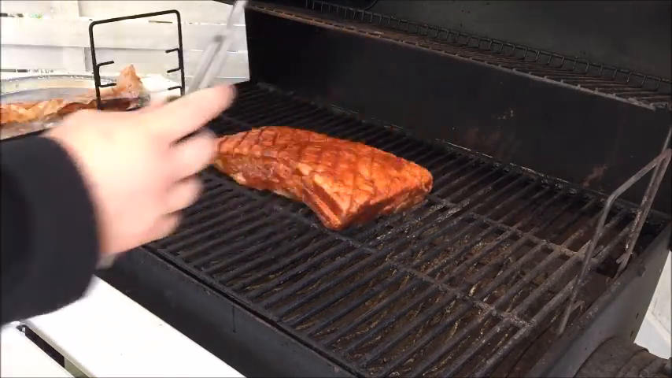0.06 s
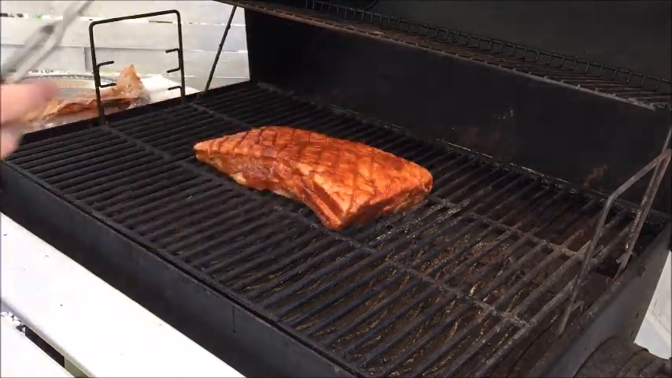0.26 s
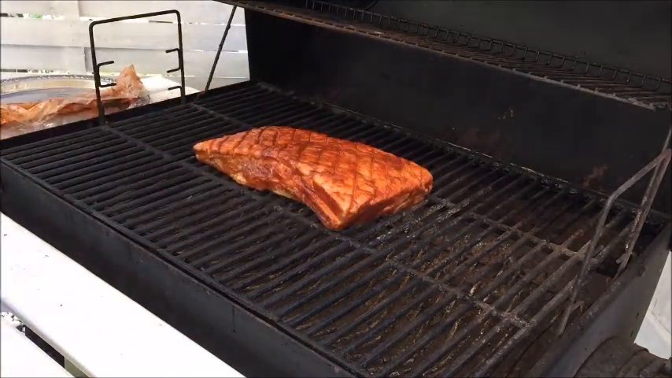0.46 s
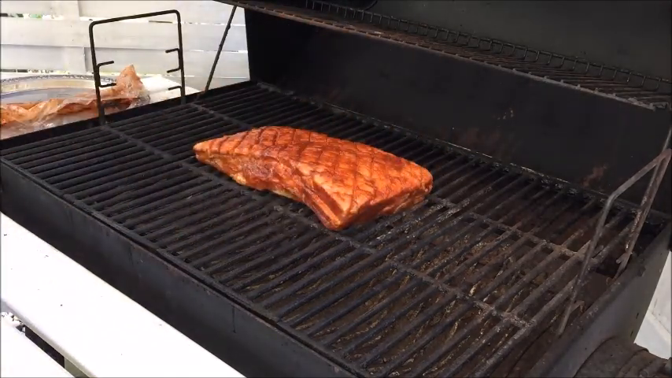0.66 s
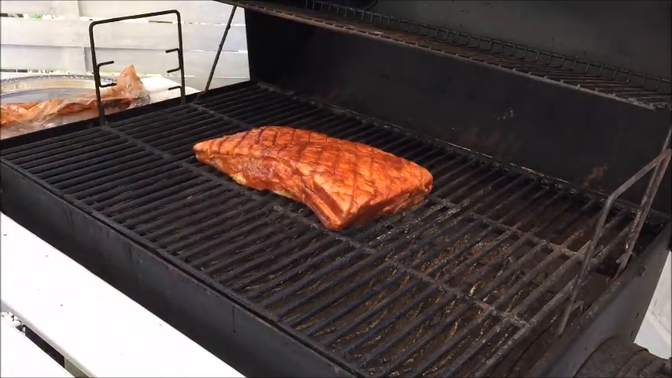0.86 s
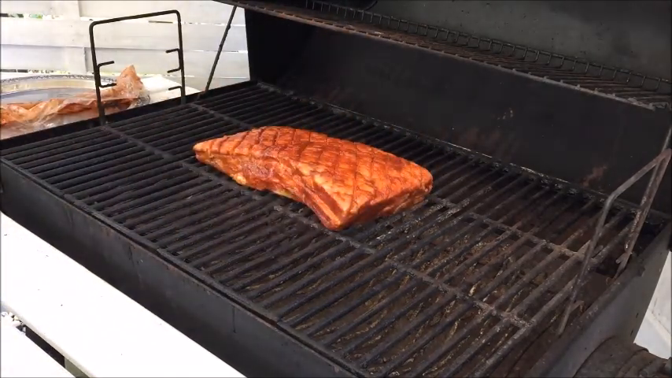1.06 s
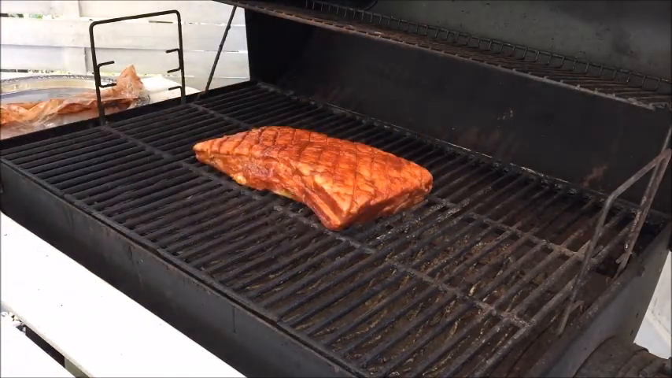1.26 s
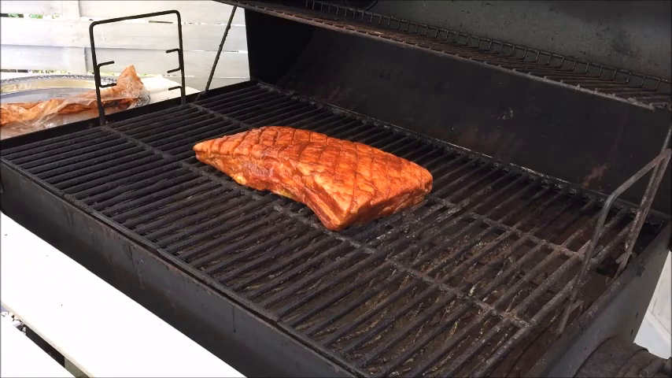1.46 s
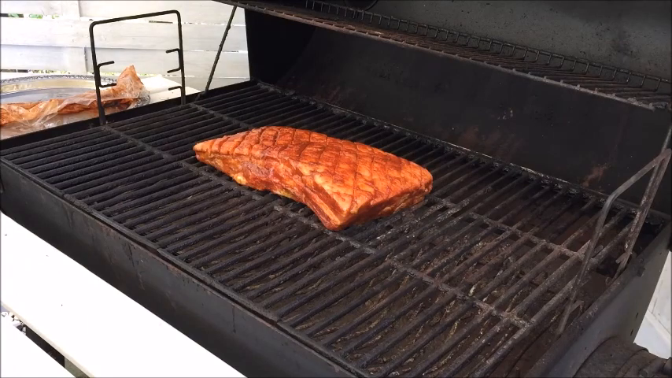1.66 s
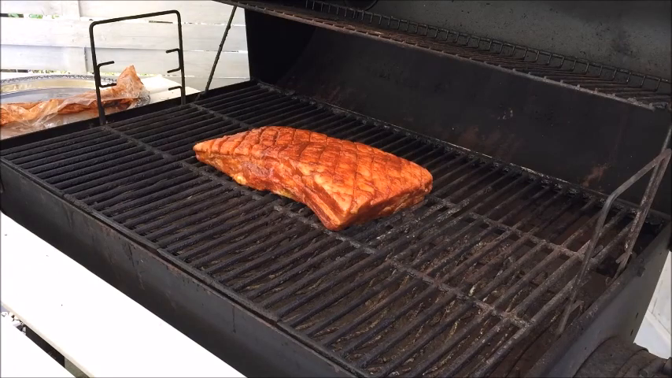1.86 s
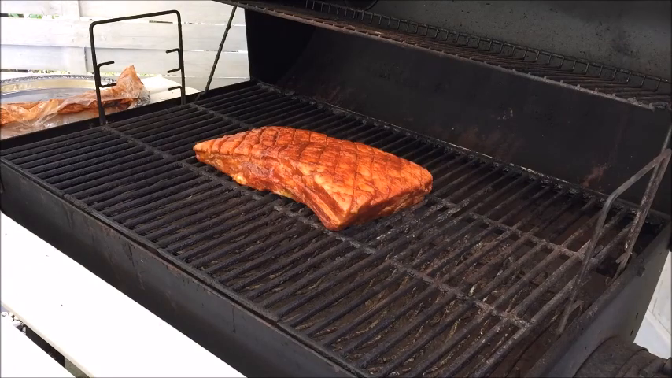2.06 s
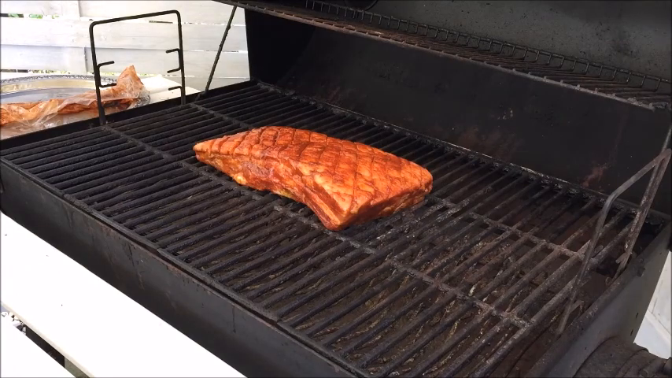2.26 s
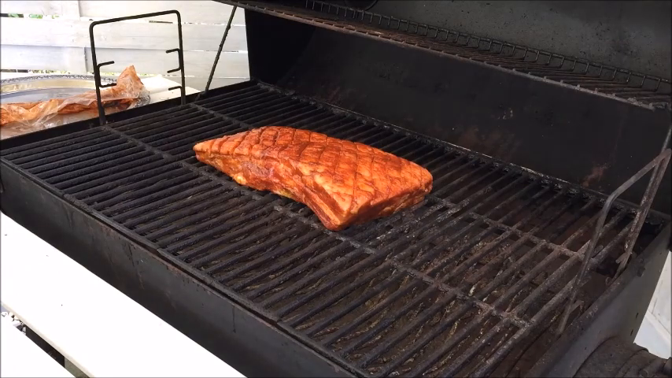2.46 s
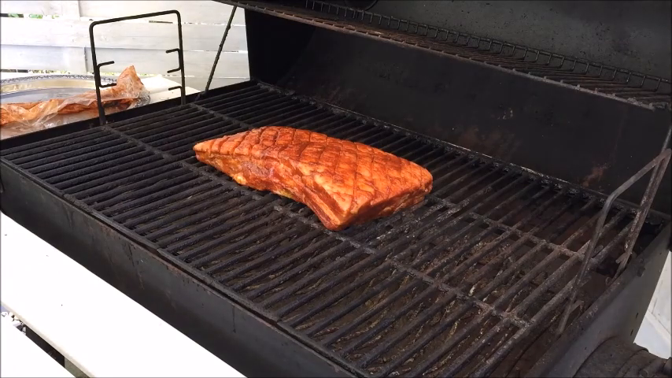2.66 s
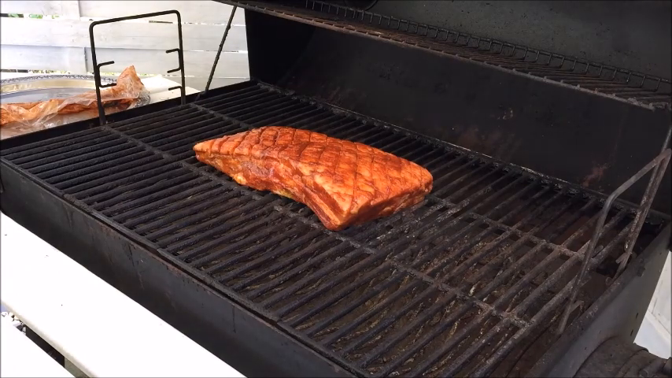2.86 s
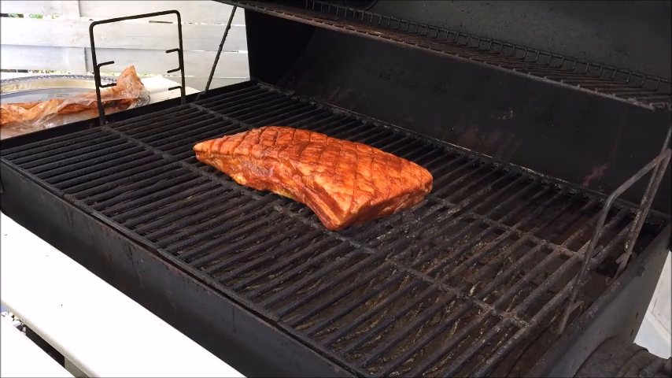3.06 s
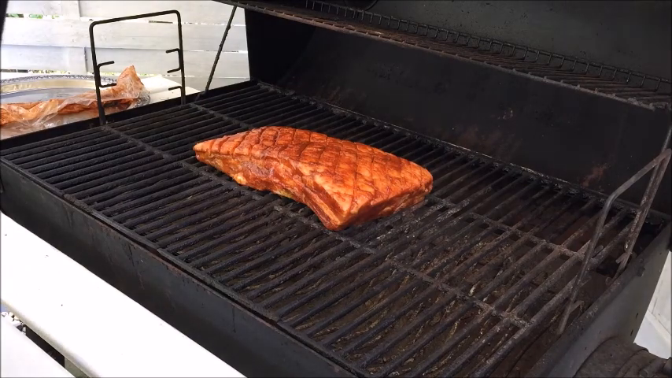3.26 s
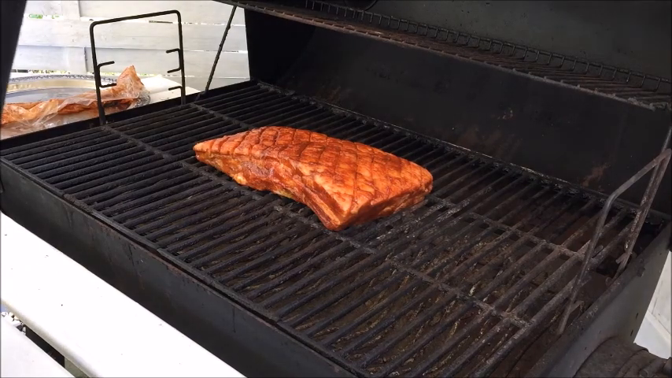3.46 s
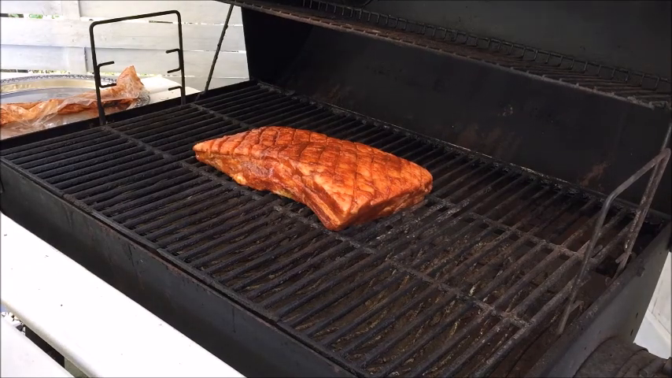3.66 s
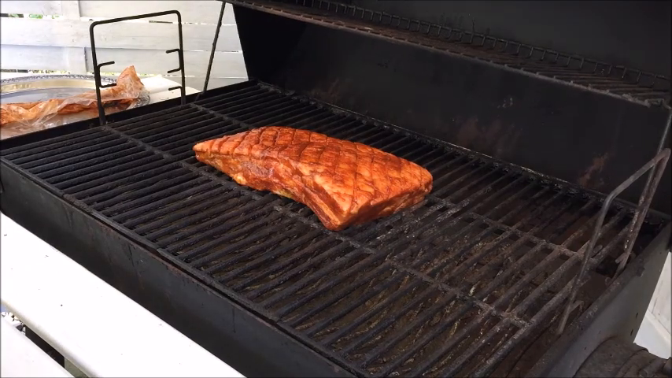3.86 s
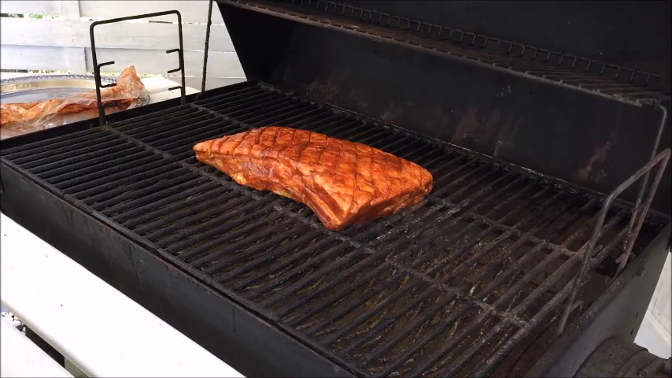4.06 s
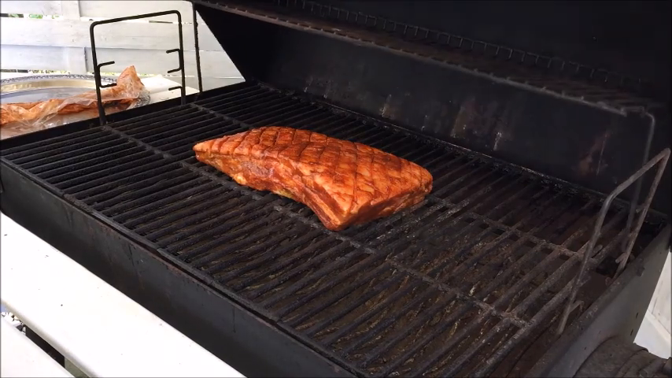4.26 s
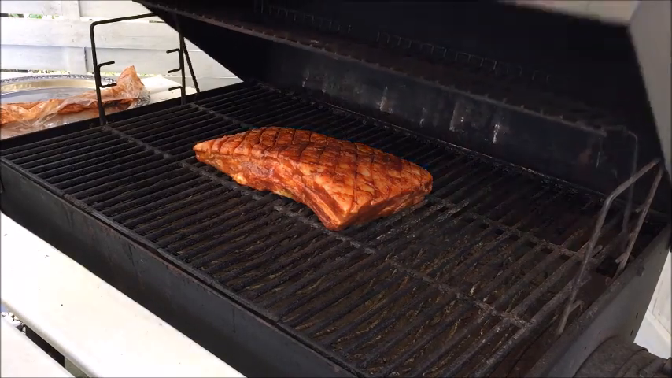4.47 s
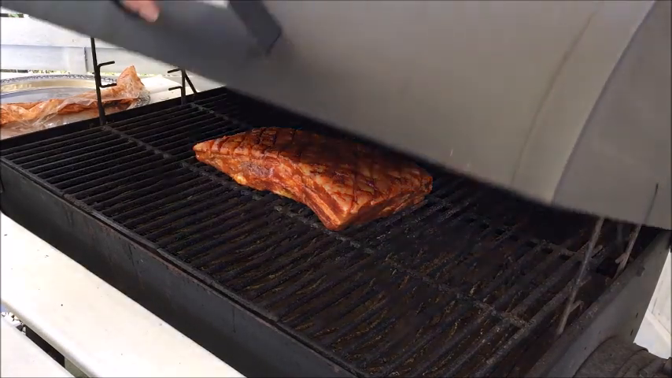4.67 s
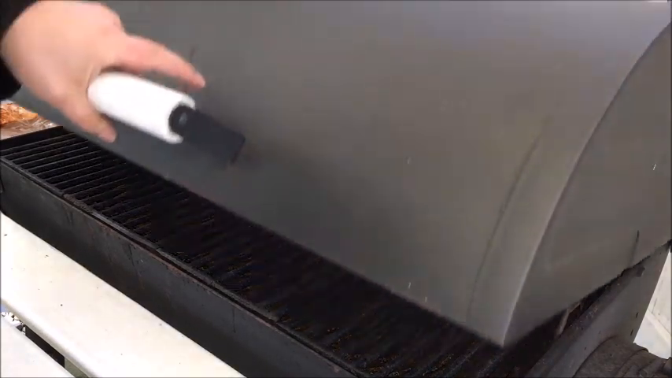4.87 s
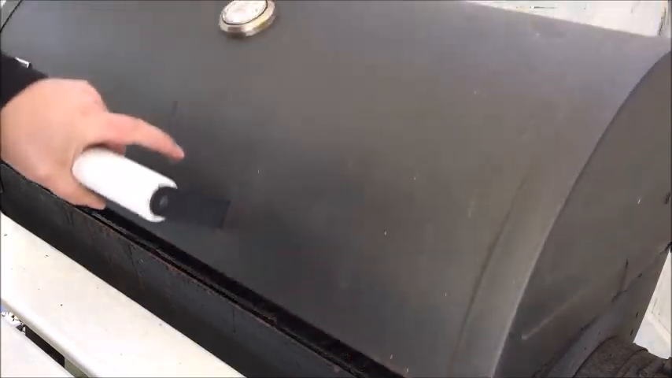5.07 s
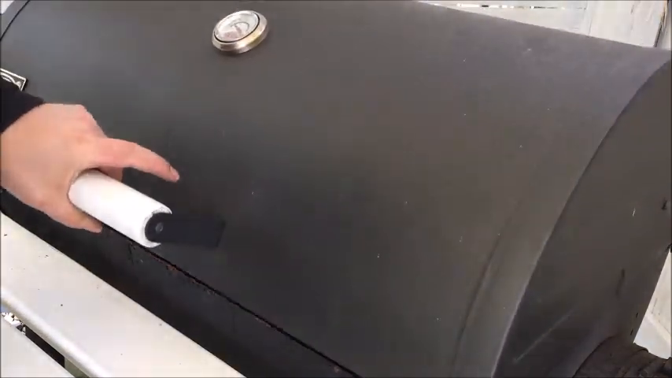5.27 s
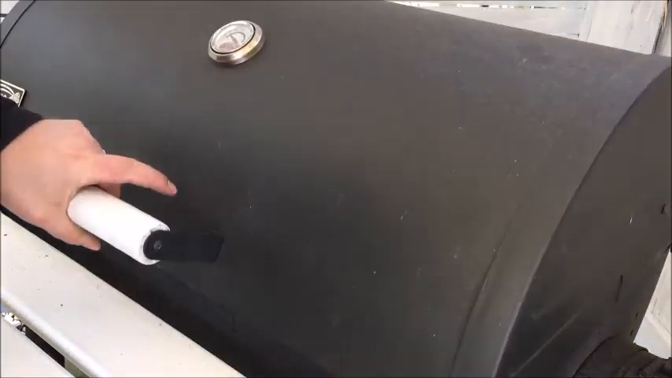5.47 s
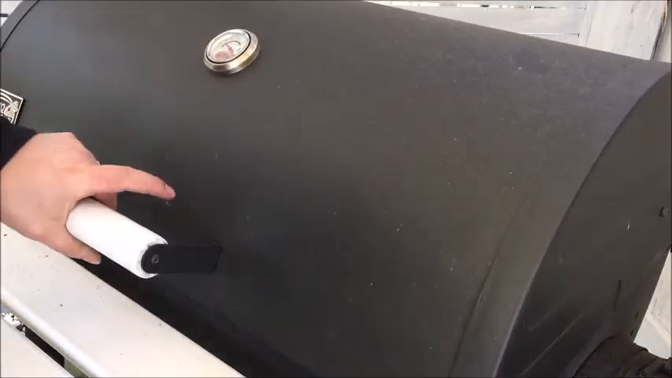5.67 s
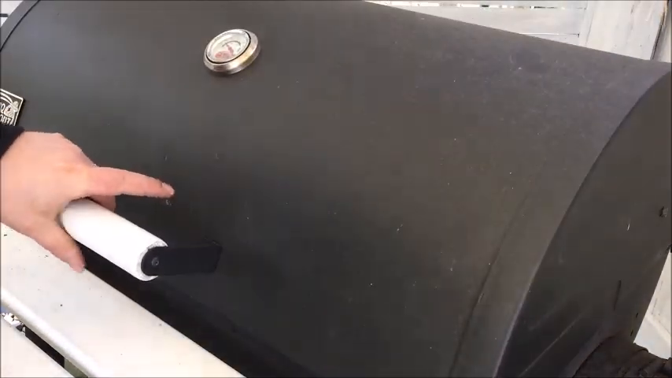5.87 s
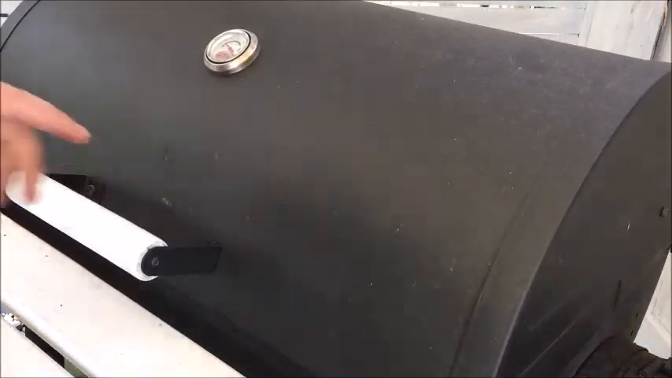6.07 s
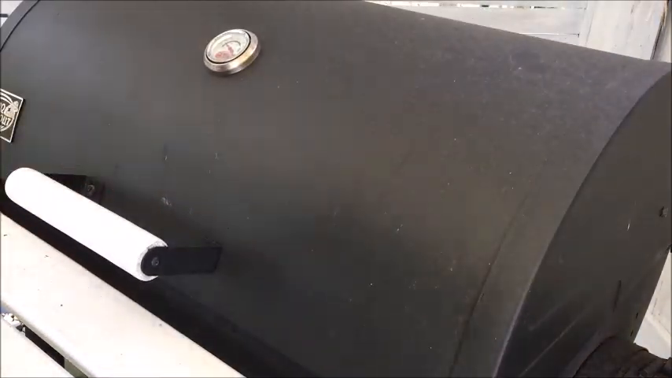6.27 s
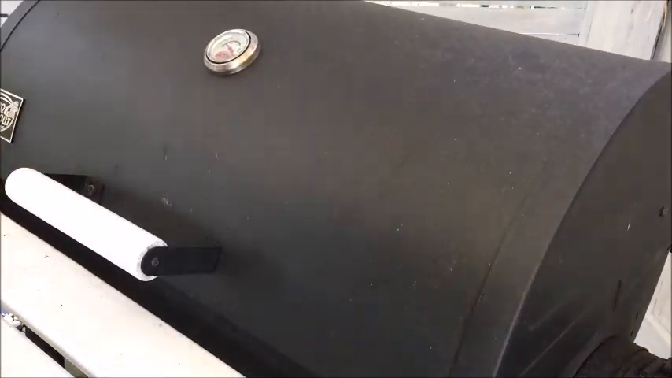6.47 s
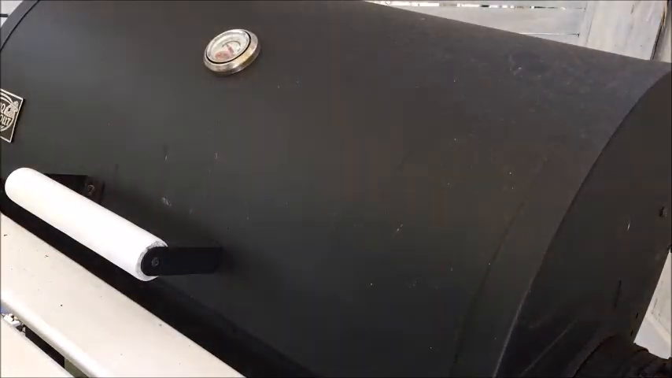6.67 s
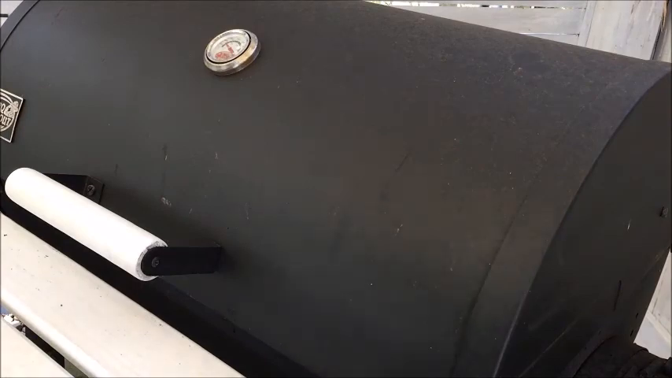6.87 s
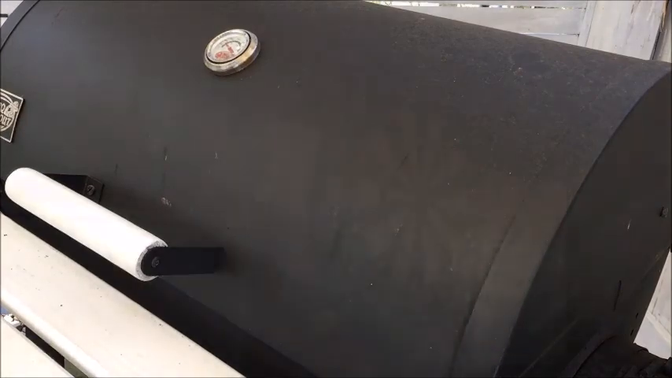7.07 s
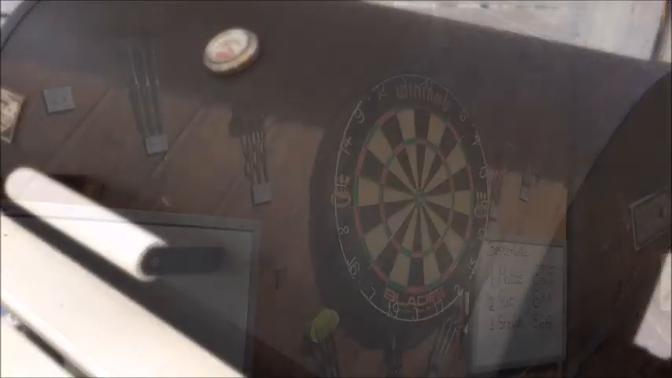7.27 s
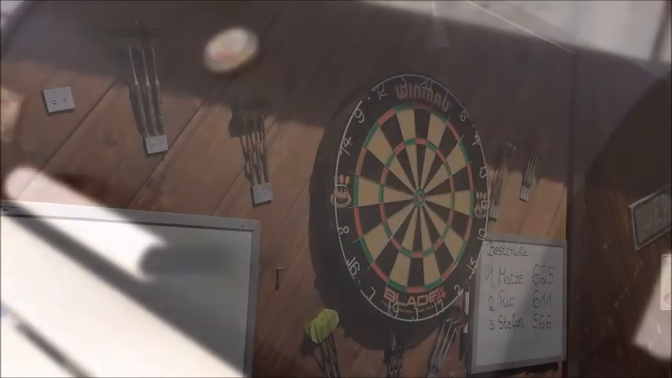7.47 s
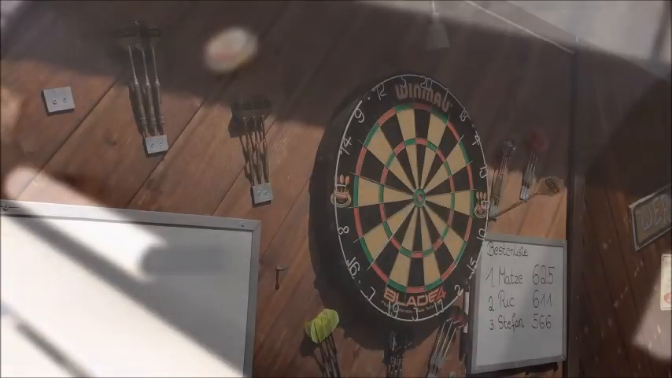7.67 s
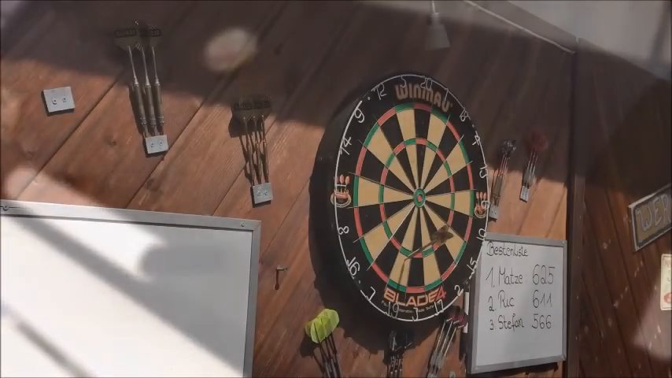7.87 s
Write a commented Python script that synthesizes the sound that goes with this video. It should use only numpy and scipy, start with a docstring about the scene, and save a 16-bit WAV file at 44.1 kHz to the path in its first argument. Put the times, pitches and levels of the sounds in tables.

```python
"""Outdoors, one microphone close to a steel barrel smoker. Traffic rumbles far off and small birds repeat
their songs in the trees throughout. First, tongs click, scrape and snap shut among hollow bumps; at 3.7 s
a steel utensil is set down. From 4.2 s the lid swings down on a dry, grinding, squeaking hinge, and at
5.7 s it slams: the barrel booms, the racks rattle, the lid and grate ring out. At the very end come
faint rustling ticks, some low buffeting and one dull knock."""
import sys
import numpy as np
from scipy import signal
from scipy.fft import rfft, irfft, next_fast_len
from scipy.io import wavfile
from scipy.ndimage import map_coordinates

SR = 44100
rng = np.random.default_rng(int(sys.argv[2]) if len(sys.argv) > 2 else 0)


def file_out(sig):
    """Save sig as 16-bit WAV at sys.argv[1]."""
    # one column per channel
    cols = np.atleast_2d(sig).T
    # limit, then scale
    lim = np.clip(cols, -1, 1)
    pcm = np.round(lim * 32767).astype(np.int16)
    wavfile.write(sys.argv[1], SR, pcm)


N = 349713


def amp(db):
    return 10 ** (np.asarray(db) / 20)


def unit(x):
    """Scales to an rms of one."""
    return x / np.sqrt(np.mean(x ** 2) + 1e-20)


def clock(seconds):
    return np.arange(int(seconds * SR)) / SR


def at_hz(points, hz):
    """Reads a table of (Hz, value) on a log-frequency axis."""
    f, value = np.transpose(points)
    return np.interp(np.log(hz + 1), np.log(f + 1), value)


def curve(rows, column=1, outside=None):
    """One column of a time table at every sample."""
    rows = np.array(rows)
    return np.interp(np.arange(N) / SR, rows[:, 0], rows[:, column], outside, outside)


def add(mix, start_s, sound):
    part = mix[round(start_s * SR):][:len(sound)]
    part += sound[:len(part)]


def colour(x, spectrum, tilt_db=0):
    """Gives x a spectrum, tilted per octave above 350 Hz, at an rms of one."""
    size = next_fast_len(len(x))
    hz = np.fft.rfftfreq(size, 1 / SR)
    octaves = np.log2(np.maximum(hz, 350) / 350)
    gain = amp(at_hz(spectrum, hz) + tilt_db * octaves)
    return unit(irfft(rfft(x, size) * gain, size)[:len(x)])


def noise(size, spectrum, tilt_db=0):
    return colour(rng.standard_normal(size), spectrum, tilt_db)


def drift(size, per_s):
    """A smooth random wander of rms about one."""
    at = np.arange(size) * per_s / SR
    return map_coordinates(rng.standard_normal(4096), [at], order=1, mode="wrap")


def gritty(size, depth_db):
    """A rough surface catches and lets go hundreds of times a second."""
    return unit(amp(depth_db * drift(size, 450)))


def dense_modes(t, spectrum, t60s):
    """A crowd of modes too dense to tell apart, each band dying at its own speed."""
    hz, at, bands = signal.stft(noise(len(t), spectrum), SR, nperseg=256)
    decay = amp(-60 * at / at_hz(t60s, hz)[:, None])
    return signal.istft(bands * decay, SR, nperseg=256)[1][:len(t)]


def modes(table, t):
    """One complex decaying tone for each mode."""
    hz, db, t60 = np.transpose(table)[:, :, None]
    return amp(db) * np.exp((2j * np.pi * hz - np.log(1000) / t60) * t)


def strike(tones):
    """Every contact point mixes the modes anew, in random phases."""
    return (np.exp(2j * np.pi * rng.random(len(tones))) @ tones).real


def yard(x, t60, wet_db):
    """Scattered echoes reach the microphone from walls and fences."""
    t = clock(.6)
    taps = rng.standard_normal(len(t)) * (rng.random(len(t)) < .1)
    taps *= (t > .004) * np.exp(-np.log(1000) * t / t60)
    return x + amp(wet_db) * signal.oaconvolve(x, taps / np.linalg.norm(taps))[:N]


# Open air all around. Each row: frequency in Hz, relative density in dB.
AIR_SPECTRUM = [(150, 1.5), (250, 2), (282, -1.5), (444, -9), (1060, -7.5), (1280, -10.5), (4260, -15.5),
                (4900, -19), (9010, -21.5), (10400, -25), (13400, -23), (16000, -28.5)]
# Each row: time in seconds, level of the air in dB.
AIR_LEVEL = [(0, -66.5), (6.8, -67), (7.3, -63), (7.93, -65)]


def air():
    """The soft, nearly steady hiss of the yard."""
    return noise(N, AIR_SPECTRUM) * amp(curve(AIR_LEVEL))


# Traffic, far off. Each row: frequency in Hz, relative density in dB.
TRAFFIC_SPECTRUM = [(12, -65), (24, -31.5), (38, -17), (54, 3), (70, 2), (97, -7.5), (124, -10), (167, -18),
                    (200, -7), (260, -44), (440, -120)]
# Each row: time in seconds, level of the traffic in dB.
TRAFFIC_LEVEL = [(0, -58), (1.0, -57), (2.8, -61.5), (5.3, -56), (7.93, -62.5)]


def traffic(flutter_db=4.3):
    """A low rumble that swells and fades unevenly."""
    return noise(N, TRAFFIC_SPECTRUM) * amp(curve(TRAFFIC_LEVEL) + flutter_db * drift(N, 6.7))


# A far motor drawing away. Each row: time in seconds, pitch in Hz, level in dB.
MOTOR_PATH = [(0, 221.7, -62.5), (1.0, 223, -62.5), (1.8, 222, -75), (2.6, 214.2, -64), (3.3, 210, -76.5),
              (7.93, 194, -82)]


def motor(wavers_per_s=26, flutter_db=3):
    """One wavering drone that sinks in pitch."""
    waver = drift(N, wavers_per_s) + 1j * drift(N, wavers_per_s)
    turns = np.cumsum(curve(MOTOR_PATH)) / SR
    drone = unit((waver * np.exp(2j * np.pi * turns)).real)
    return drone * amp(curve(MOTOR_PATH, column=2) + flutter_db * drift(N, 18))


def bird_note(length, contour, warble_hz=43.7, warbles_per_s=330, flutter_db=3):
    """One fluttering note that follows a contour of (share of the note, Hz)."""
    u = clock(length) / length
    hz = np.interp(u, *np.transpose(contour)) + warble_hz * drift(len(u), warbles_per_s)
    swell = np.sqrt(np.sin(np.pi * u)) * amp(flutter_db * drift(len(u), 70))
    return unit(swell * np.sin(2 * np.pi * np.cumsum(hz) / SR))


# A high song of falling chirps and a buzz. Each row: start in seconds, relative level in dB.
SONG_STARTS = [(.43, -78.5), (2.475, -74.5), (4.568, -68.5), (6.99, -72.5)]
# A chirp falls slowly, then hooks down. Each row: share of the note, pitch in Hz.
CHIRP_CONTOUR = [(0, 7560), (.3, 7310), (.72, 7170), (1, 6680)]
# A second bird's two-note slur. Each row: start in seconds, relative level in dB.
SLUR_STARTS = [(.28, -67.5), (1.779, -75.5), (2.345, -78), (2.71, -76.5), (3.441, -80.5), (5.628, -66),
               (6.818, -69), (7.08, -65)]
# Each row: delay and length in seconds, first and last pitch in Hz, level offset in dB.
SLUR_NOTES = [(0, 0.054, 3935, 3660, -3), (0.045, 0.0532, 3497, 3150, -1.5)]
# Lower whistles. Each row: start and length in seconds, first and last pitch in Hz, relative level in dB.
WHISTLE_NOTES = [(2.401, 0.069, 2270, 2120, -64.5), (3.539, 0.055, 2120, 2380, -69),
                 (6.247, 0.079, 2660, 2252, -70.5), (7.285, 0.13, 1823, 1890, -69),
                 (7.544, 0.102, 2684, 2730, -61), (7.622, 0.092, 2325, 2306, -63)]


def birds(chirps=3, chirp_every_s=.187, chirp_step_hz=-88.5):
    """Songs, slurs and whistles from the trees, thrown back by a wall."""
    out = np.zeros(N)
    for s, db in SONG_STARTS:
        for k in range(chirps):
            contour = [(u, hz + k * chirp_step_hz) for u, hz in CHIRP_CONTOUR]
            add(out, s + k * chirp_every_s, amp(db) * bird_note(.098, contour))
        buzz = bird_note(0.1, [(0, 5480)], warble_hz=380, warbles_per_s=670)
        add(out, s + chirps * chirp_every_s, amp(db - 3.5) * buzz)
    for s, db in SLUR_STARTS:
        for delay, length, first_hz, last_hz, offset_db in SLUR_NOTES:
            slur = bird_note(length, [(0, first_hz), (1, last_hz)], warble_hz=140, warbles_per_s=600)
            add(out, s + delay, amp(db + offset_db) * slur)
    for s, length, first_hz, last_hz, db in WHISTLE_NOTES:
        add(out, s, amp(db) * bird_note(length, [(0, first_hz), (1, last_hz)]))
    add(out, 0.019, amp(-11) * out)  # the wall's echo
    return amp(-1.5) * yard(out, t60=0.12, wet_db=2)


# Buffeting at the microphone. Each row: time in seconds, level in dB.
BUFFET_LEVEL = [(7.55, -94), (7.66, -43.5), (7.72, -56.5), (7.8, -41), (7.86, -58), (7.93, -41)]


def buffeting():
    """Three quick surges of very low noise."""
    spectrum = [(22, -35.5), (42, 13.5), (60, 7), (110, -0.5), (200, -20), (500, -67), (2000, -88)]
    return noise(N, spectrum) * amp(curve(BUFFET_LEVEL, outside=-120))


# The closing knock. Each row: frequency in Hz, relative density in dB.
KNOCK_SPECTRUM = [(40, -3), (90, 10.5), (200, -13), (500, 2.5), (1000, -6), (2000, -11.5), (3500, -18),
                  (7000, -22.5), (15000, -29)]
# Each row: frequency in Hz, t60 in seconds.
KNOCK_DECAY = [(90, 0.9), (400, 0.057), (2000, 0.12), (8000, 0.038)]


def knock(lands_s=7.8935, lead_s=0.0068, rise_s=0.00087):
    """A dull knock that touches lightly before it lands."""
    t, out = clock(.3), np.zeros(N)
    onset = 1 - np.exp(-t / rise_s)
    for s, db in (lands_s - lead_s, -43), (lands_s, -30):
        add(out, s, amp(db) * onset * dense_modes(t, KNOCK_SPECTRUM, KNOCK_DECAY))
    return out


# Light clicks and scrapes: tongs at first, faint rustling ticks near the end.
# Each row: start in seconds, level in dB, tilt in dB per octave, fall in seconds.
LIGHT_CONTACTS = [(0.125, -62, -4, 0.033), (.396, -58.5, -2, 0.019), (.412, -49, 0.5, 0.0071),
                  (.651, -67, 10, 0.01), (1.201, -62.5, -1, 0.017), (1.227, -55, 0.5, 0.006),
                  (1.253, -54.5, -3, .0087), (1.582, -59.5, -4.5, 0.018), (2.085, -58, -4, .0047),
                  (2.205, -51, -3.5, .003), (2.55, -54, 6, .0039), (3.179, -63.5, -7, 0.017),
                  (3.298, -68, -2, 0.042), (3.763, -61, 18, .0045), (4.406, -58, -8, 0.028),
                  (4.449, -57, -5, 0.046), (6.99, -64.5, 4, 0.0076), (7.404, -62.5, -3, 0.052),
                  (7.756, -62, 0, .014)]
# Their bright scrape. Each row: frequency in Hz, relative density in dB.
SCRAPE_SPECTRUM = [(150, -9), (400, -11), (700, 1), (1400, 4), (2200, 9.5), (2700, 4.5), (3200, 5.5),
                   (4000, 7), (4800, 1), (6000, 6.5), (9400, -2), (11500, 0), (15500, -8)]


def clicks_and_scrapes(rise_share=0.083, tail_db=-21, tail_s=0.0087):
    """Short bursts of friction; the longer a contact lasts, the softer it starts."""
    t, out = clock(.25), np.zeros(N)
    for s, db, tilt_db, fall_s in LIGHT_CONTACTS:
        onset = 1 - np.exp(-t / (rise_share * fall_s))
        contact = onset * np.exp(-t / fall_s)
        shape = contact / contact.max() + amp(tail_db) * onset * np.exp(-t / tail_s)
        scrape = gritty(len(t), depth_db=-0.5) * noise(len(t), SCRAPE_SPECTRUM, tilt_db)
        add(out, s, amp(db) * shape * scrape)
    return yard(out, t60=0.1, wet_db=-2.5)


# Things being handled nearby. Each row: start in seconds, pitch in Hz, level in dB.
HOLLOW_BUMPS = [(1.064, 1420, -52), (1.091, 770, -53), (1.253, 1220, -53), (1.583, 300, -46.5),
                (1.587, 536, -53.5), (2.17, 1500, -53.5), (2.645, 304, -52), (6.944, 740, -51),
                (6.965, 535, -58)]


def bumps(rise_s=.003, fall_s=0.017, scuff_db=-11):
    """A soft contact rings one hollow resonance and scuffs a little."""
    t, out = clock(.25), np.zeros(N)
    shape = (1 - np.exp(-t / rise_s)) * np.exp(-t / fall_s)
    for s, hz, db in HOLLOW_BUMPS:
        peak = signal.iirpeak(hz, Q=2.5, fs=SR)
        hollow = signal.lfilter(*peak, rng.standard_normal(len(t)))
        hollow = unit(signal.lfilter(*peak, hollow))  # twice, for a steep resonance
        scuff = amp(scuff_db) * noise(len(t), SCRAPE_SPECTRUM, tilt_db=-8)
        add(out, s, amp(db) * shape * (hollow + scuff))
    return yard(out, t60=0.12, wet_db=-14)


# The tongs snap shut. Each row: start in seconds, click in dB, ring in dB.
TONG_SNAPS = [(.414, -60, -50.5), (2.2145, -32.5, -57)]
# The click of the tips. Each row: frequency in Hz, relative density in dB.
TIP_SPECTRUM = [(400, -28), (1200, -13), (1600, 11), (2600, -8), (3200, 7), (4000, -6), (4850, 11),
                (5600, 1), (7100, 0), (9500, -3), (11500, -15), (16000, -22)]
# The arms. Each row: frequency in Hz, relative level in dB, t60 in seconds.
ARM_MODES = [(1850, -0.5, 0.1), (2216, 2, 0.07), (2410, 0, .06), (3090, -14.5, 0.12), (4710, -2.5, 0.069),
             (6180, -13, 0.053), (9250, -6, 0.054)]


def snaps(click_s=0.00069, tail_db=-24, tail_s=.013):
    """The tips of the tongs meet in a hard click that leaves the arms ringing."""
    t, out = clock(.25), np.zeros(N)
    shape = t / click_s * np.exp(1 - t / click_s) + amp(tail_db) * np.exp(-t / tail_s)
    ring = modes(ARM_MODES, t).imag.sum(0)
    for s, click_db, ring_db in TONG_SNAPS:
        click = shape * noise(len(t), TIP_SPECTRUM)
        add(out, s, amp(click_db) * click + amp(ring_db) * ring)
    return yard(out, t60=0.1, wet_db=-10)


# A utensil set down nearby. Each row: start in seconds, level in dB.
UTENSIL_CONTACTS = [(3.664, -45), (3.6705, -37), (3.685, -57), (3.828, -62.5)]
# Its ring. Each row: frequency in Hz, relative level in dB, t60 in seconds.
UTENSIL_MODES = [(560, -5, .22), (730, -8, .16), (860, -3, .14), (985, -2, .13), (1200, -4, .18),
                 (1330, -3, .14), (1384, -7, .17), (1712, -3, .18), (2159, -3, .18), (2272, 1, .22),
                 (2420, -5, .18), (2853, 0, .18), (3354, -8, .22), (5792, -15, .18), (6761, -8, .15),
                 (9200, -14, .15)]
# Its scuff. Each row: frequency in Hz, relative density in dB.
UTENSIL_SPECTRUM = [(350, -11.5), (600, -1.5), (1500, -2), (2800, -3), (3600, -8.5), (7000, -12),
                    (10500, -12.5), (15500, -20)]


def utensil(ring_db=-9, fall_s=0.015, rise_s=0.00037):
    """A steel utensil lands in a quick clatter and rings briefly."""
    t, out = clock(.5), np.zeros(N)
    tones = modes(UTENSIL_MODES, t)
    onset = 1 - np.exp(-t / rise_s)
    for s, db in UTENSIL_CONTACTS:
        ring = amp(ring_db) * strike(tones)
        scuff = noise(len(t), UTENSIL_SPECTRUM) * np.exp(-t / fall_s)
        add(out, s, amp(db) * onset * (scuff + ring))
    return yard(out, t60=0.3, wet_db=-7)


# Each row: start and length in seconds, pitch in Hz, level in dB.
HINGE_SQUEAKS = [(4.4, 0.024, 4010, -62.5), (4.453, 0.055, 2110, -49.5), (4.68, 0.095, 2850, -71),
                 (4.805, 0.072, 2250, -69), (4.887, 0.047, 1237, -57), (5.14, 0.06, 1177, -55.5)]


def squeaks(wobble_hz=100, wobbles_per_s=600):
    """Now and then the hinge sticks and slips fast enough to sing."""
    out = np.zeros(N)
    for s, length, hz, db in HINGE_SQUEAKS:
        u = clock(length) / length
        turns = np.cumsum(hz + wobble_hz * drift(len(u), wobbles_per_s)) / SR
        add(out, s, amp(db) * np.sin(np.pi * u) * np.sin(2 * np.pi * turns))
    return yard(out, t60=0.18, wet_db=0.5)


# The lid coming down. Each row: time in seconds, effort on the hinge in dB.
SWING_EFFORT = [(4.18, -82), (4.32, -62.5), (4.44, -70), (4.54, -56.5), (4.72, -61.5), (4.92, -51),
                (5.1, -63.5), (5.22, -60), (5.43, -82)]
# The hinge binds. Each row: start and length in seconds, relative level in dB.
HINGE_BINDS = [(4.304, 0.12, -64.5), (4.451, 0.11, -48.5), (5.122, 0.071, -54.5), (5.642, 0.14, -67)]
# The hinge's grind and the shell's groan. Each row: frequency in Hz, relative density in dB.
GRIND_SPECTRUM = [(300, -14.5), (400, -1.5), (480, -14.5), (545, 7.5), (620, -5), (720, -2), (950, -5),
                  (1200, -4), (1600, -8), (2250, -14), (3000, -28), (5000, -40), (10000, -54)]
GROAN_SPECTRUM = [(90, -63), (150, -4.5), (190, 1.5), (260, -12), (390, -15), (600, -39), (1500, -69)]


def hinge(slips_per_s=420, angles=8, damping_per_s=15, ease_s=0.1, gain_db=-3):
    """Tiny slips of the dry hinge excite the lid, whose resonances shift as it swings."""
    t, now = clock(.3), np.arange(N) / SR
    slips = rng.exponential(1, N) * rng.choice([-1, 1], N) * (rng.random(N) < slips_per_s / SR)
    angle = np.linspace(0, 2 * angles, N)
    shaken = np.zeros(N)
    for k in range(angles):  # each lid angle has its own set of resonances, fading into the next
        distance = abs((angle - k + 1) % angles - 1)
        weight = np.cos(np.pi / 2 * np.minimum(distance, 1))
        response = unit(rng.standard_normal(len(t)) * np.exp(-damping_per_s * t))
        shaken += signal.oaconvolve(slips * weight, response)[:N]
    shaken *= amp(2.5 * drift(N, 35))  # the hand moves unevenly
    effort_db = curve(SWING_EFFORT)
    inside_s = np.minimum(now - SWING_EFFORT[0][0], SWING_EFFORT[-1][0] - now)
    moving = np.clip(1 + inside_s / ease_s, 0, 1)
    grind = moving * amp(effort_db)
    for s, length, db in HINGE_BINDS:
        add(grind, s, amp(db) * np.sin(np.pi * clock(length) / length))
    groan = moving * amp(-44 + 0.56 * (effort_db + 53.5))  # grows 0.56 dB per dB of effort
    return amp(gain_db) * (grind * colour(shaken, GRIND_SPECTRUM) + groan * colour(shaken, GROAN_SPECTRUM))


# The cooking grate. Each row: frequency in Hz, relative level in dB, t60 in seconds.
GRATE_MODES = [(382, -56, 2.6), (506, -54, 1.8), (571, -63, 2.4), (662, -51, 1.4), (721, -60, 5.0),
               (743, -42, 1.0), (894, -67, 3.6), (1066, -52, 1.7), (1108, -47, 1.3), (1136, -47, 1.7),
               (1174, -52, 1.0), (1470, -48, .9), (2050, -48, .9)]


def grate(slam_s=5.75, gain_db=-1):
    """Set going by the slam, the steel bars keep singing faintly after the lid has gone quiet."""
    out = np.zeros(N)
    add(out, slam_s, amp(gain_db) * modes(GRATE_MODES, clock(2.2)).imag.sum(0))
    return out


# Close to the microphone, a low thump as the lid starts to move, then its slam and rebounds.
# Each row: start in seconds, then the sheet's clang, the barrel's boom and the rim's crack in dB.
LID_JOLTS = [(4.282, -70, -39.5, -72), (5.741, -25.5, -5, -51), (5.7497, -25, -2, -43),
             (5.7593, -26, -24, -44), (5.7686, -47, -21.5, -57), (5.835, -33, -23, -52.5),
             (6.046, -68, -34.5, -70), (6.134, -45.5, -40, -58), (6.317, -60.5, -60, -64.5),
             (6.376, -50, -41, -57.5), (6.455, -56, -44.5, -66)]
# Loose racks inside the barrel. Each row: start in seconds, clang in dB.
RACK_RATTLES = [(4.472, -49.5), (5.89, -41), (5.97, -37.5), (5.987, -42), (6.944, -56)]
# The barrel's air and shell; the lid's steel. Each row: frequency in Hz, relative dB, t60 in seconds.
BARREL_MODES = [(115, -8, 0.1), (184.9, -9, 0.29), (205.8, 4, 0.038), (277, -4.5, 0.098), (398.4, -16, 0.2),
                (464, -26.5, 0.023)]
LID_MODES = [(97, -9, 1.0), (180, -7, 1.8), (197, -4, 1.1), (225, -4, 1.2), (294, 5, .55), (323, 1, .6),
             (380, -8, 1.0), (465, 7, .5), (573, -6, .8), (697, 2, .45), (754, -9, .8), (802, 0, .4),
             (864, 0, .4), (903, -1, .45), (1053, 3, .42), (1241, -3, .5), (1464, -3, .5), (1614, -3, .42),
             (1695, -5, .42), (1860, -5, .42), (1949, -8, .42), (2078, -9, .6), (2160, -7, .35),
             (2387, -7, .35), (2517, -7, .3), (2884, -9, .2)]
# The sheet's crowd of modes; the rim's crack. Each row: frequency in Hz, relative density in dB.
SHEET_SPECTRUM = [(60, -3), (150, 19), (300, 14), (550, 13.5), (1000, 10), (1700, 13), (2700, 7.5),
                  (3600, -3.5), (6000, -19), (10000, -33), (16000, -37)]
CRACK_SPECTRUM = [(300, -17), (1500, 3), (3000, 11), (5000, 8), (7500, 7), (10500, -0.5), (15500, -6.5)]
# The sheet's early and late decay. Each row: frequency in Hz, t60 in seconds.
EARLY_DECAY = [(100, 0.38), (500, 0.31), (1500, 0.21), (3000, 0.19), (8000, 0.06)]
LATE_DECAY = [(150, 2.57), (500, 1.9), (900, 0.75), (1130, 2.18), (1450, 0.49), (2200, 1.17), (3200, 0.7),
              (5000, 1.05), (12000, 0.45)]


def lid(ring_db=-16.5, late_db=-18, muffled_db=-29.5, clang_rise_s=0.0032, boom_rise_s=0.0028):
    """Each jolt booms in the barrel, clangs the steel and cracks at the rim; rattles mostly clang."""
    t, brief, out = clock(1.8), clock(.3), np.zeros(N)
    boom = -modes(BARREL_MODES, t).imag.sum(0) * (1 - np.exp(-t / boom_rise_s))
    low_cut = signal.butter(2, 60, "high", fs=SR, output="sos")  # the barrel cannot radiate slow motion
    boom = signal.sosfilt(low_cut, boom)
    for s, _, boom_db, _ in LID_JOLTS:
        add(out, s, amp(boom_db) * boom)
    # the shell is not quite round, so each mode is a close pair that beats
    beat_hz = 3.5 * rng.uniform(0.12, 2.51, (len(LID_MODES), 1))
    tones = modes(LID_MODES, t) * (1 + .5 * np.exp(2j * np.pi * beat_hz * t))
    onset = 1 - np.exp(-t / clang_rise_s)
    crack_shape = np.exp(-brief / 0.022) + amp(-17) * np.exp(-brief / 0.038)
    contacts = [(s, clang_db, crack_db) for s, clang_db, _, crack_db in LID_JOLTS]
    contacts += [(s, db, db + muffled_db) for s, db in RACK_RATTLES]
    for s, clang_db, crack_db in contacts:
        ring = amp(ring_db) * strike(tones)
        early = dense_modes(t, SHEET_SPECTRUM, EARLY_DECAY)
        late = amp(late_db) * dense_modes(t, SHEET_SPECTRUM, LATE_DECAY)
        add(out, s, amp(clang_db) * onset * (early + late + ring))
        crack = gritty(len(brief), depth_db=4) * noise(len(brief), CRACK_SPECTRUM)
        add(out, s, amp(crack_db) * crack_shape * crack)
    return out


def scene():
    """The smoker, the handling and the yard beyond, in mono."""
    smoker = lid() + grate() + hinge() + squeaks()
    handling = utensil() + clicks_and_scrapes() + snaps() + bumps()
    background = birds() + air() + traffic() + motor()
    return (background + buffeting() + knock() + handling + smoker)[None]


def record(dry, edge_hz=15850):
    """The recorder's band limit."""
    low_pass = signal.firwin(511, edge_hz, window=("kaiser", 9), fs=SR)
    return signal.oaconvolve(dry, low_pass[None], "same")


dry = scene()
out = record(dry)
file_out(out)
```